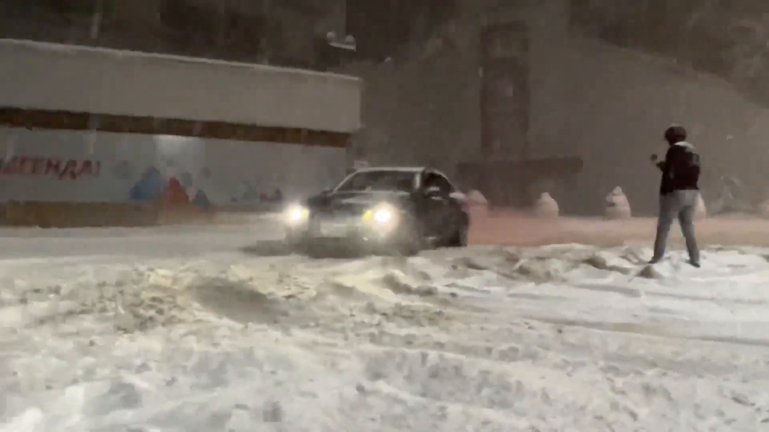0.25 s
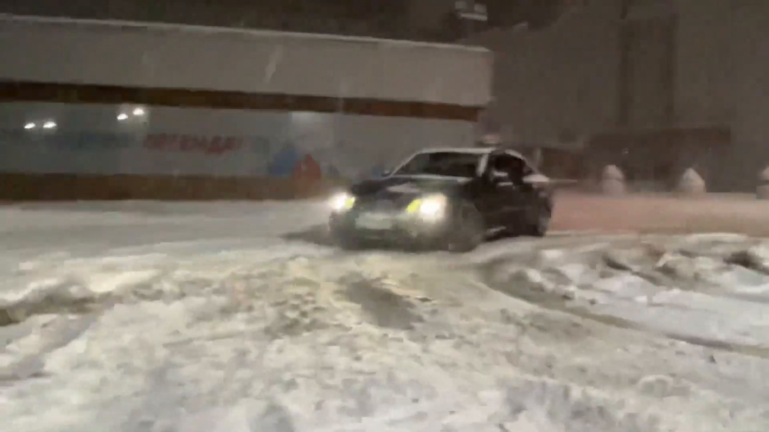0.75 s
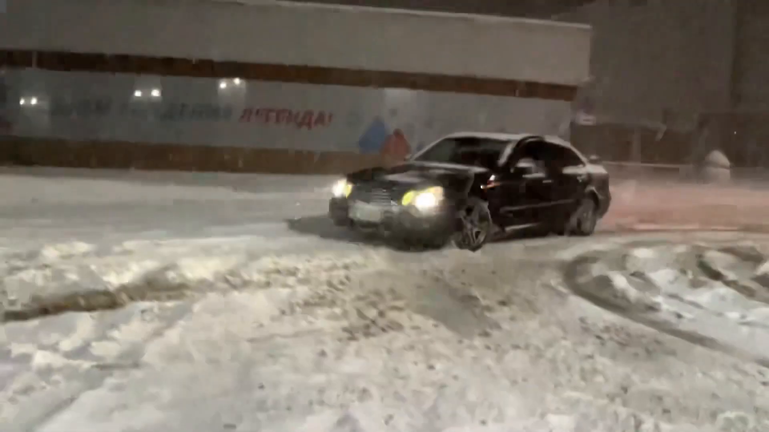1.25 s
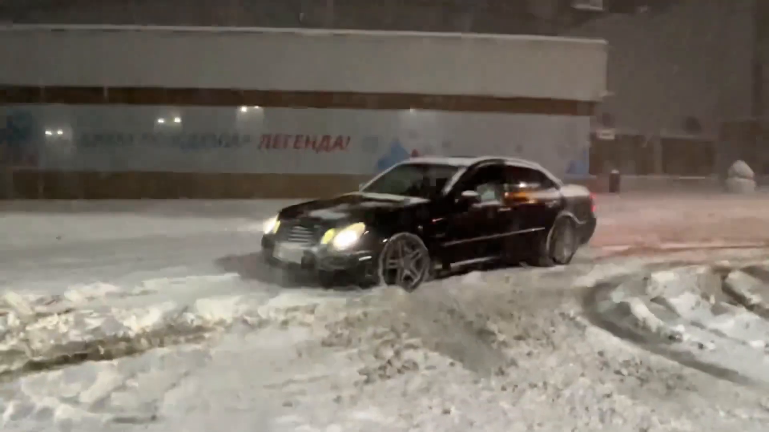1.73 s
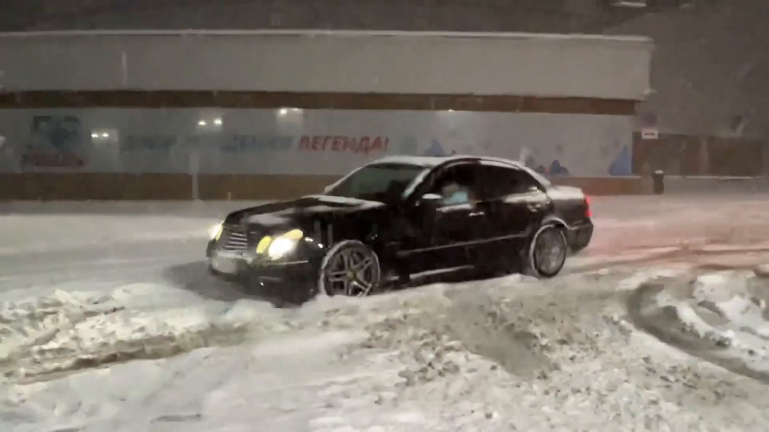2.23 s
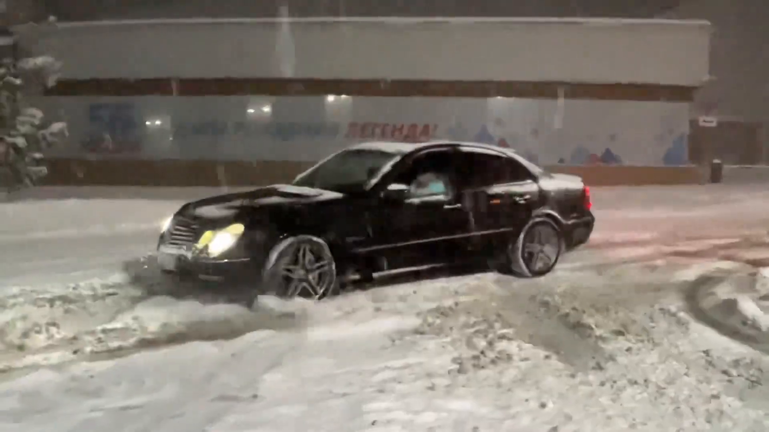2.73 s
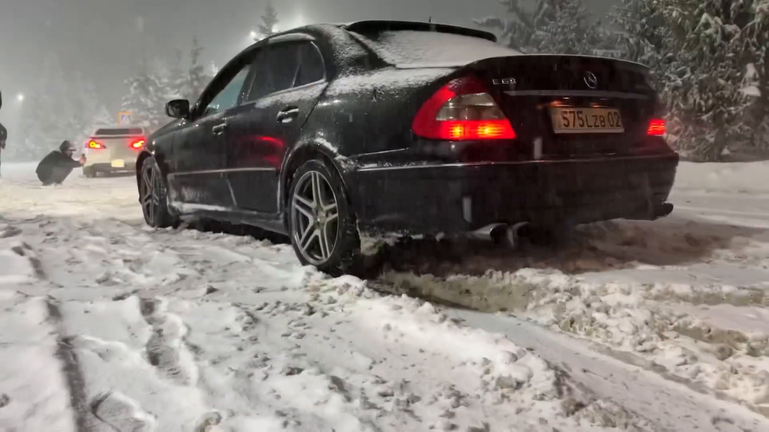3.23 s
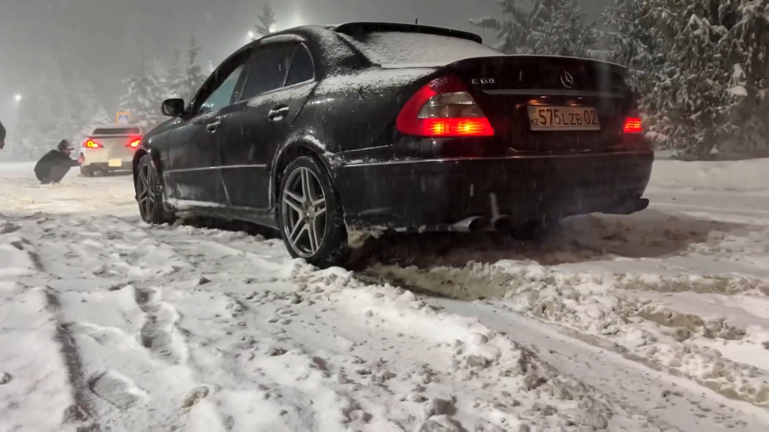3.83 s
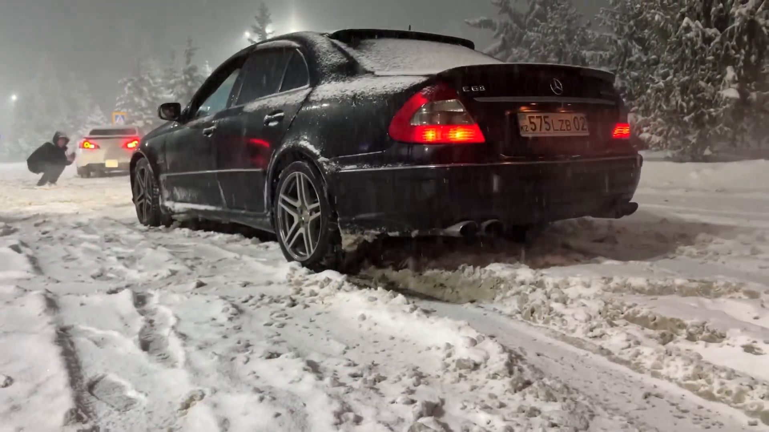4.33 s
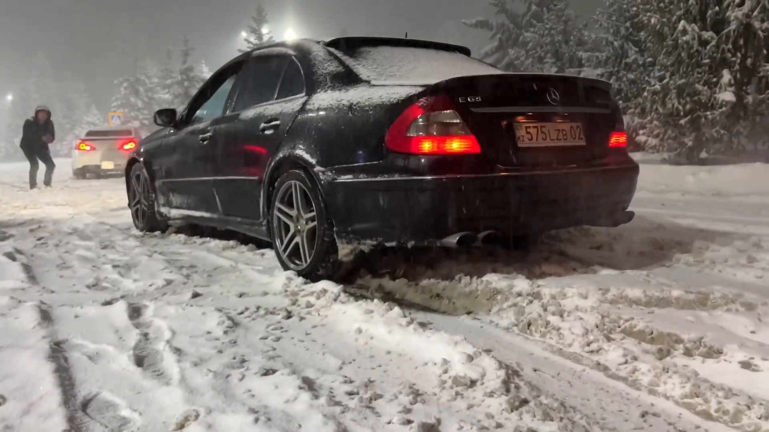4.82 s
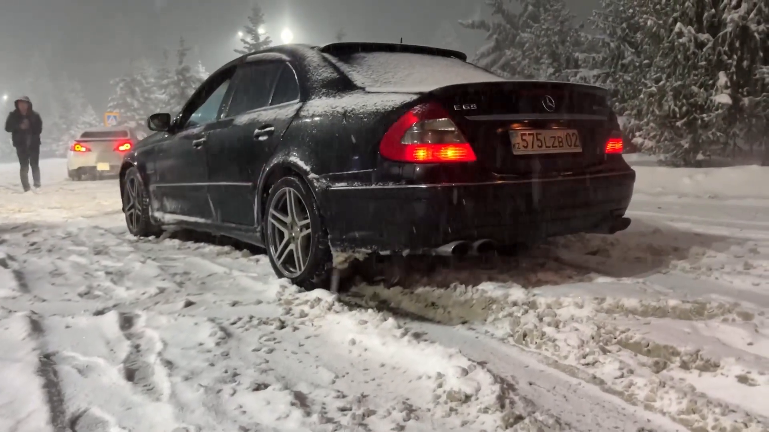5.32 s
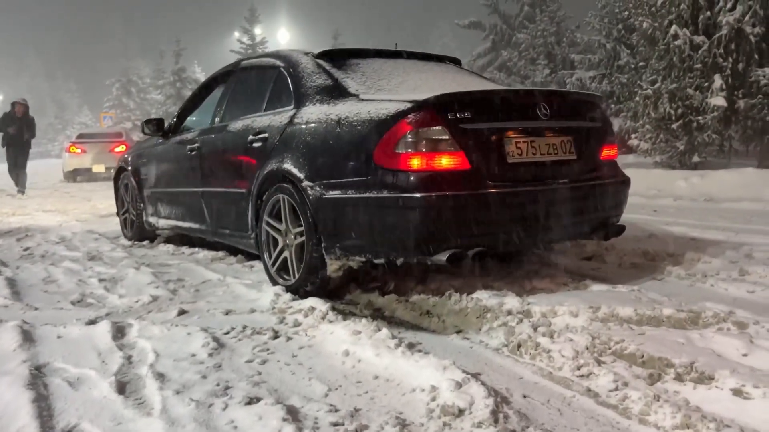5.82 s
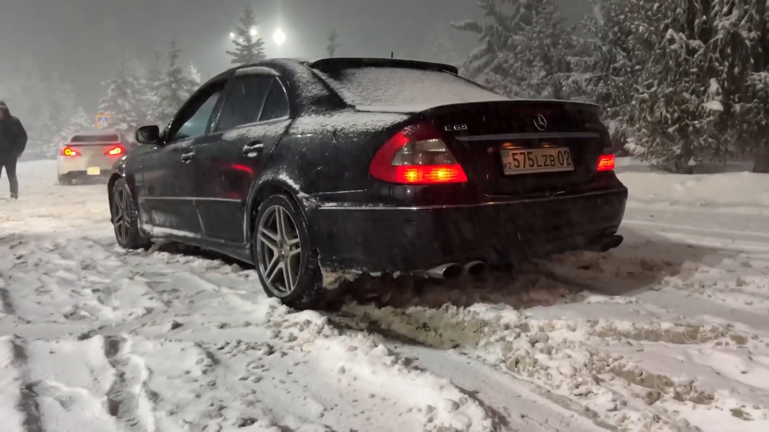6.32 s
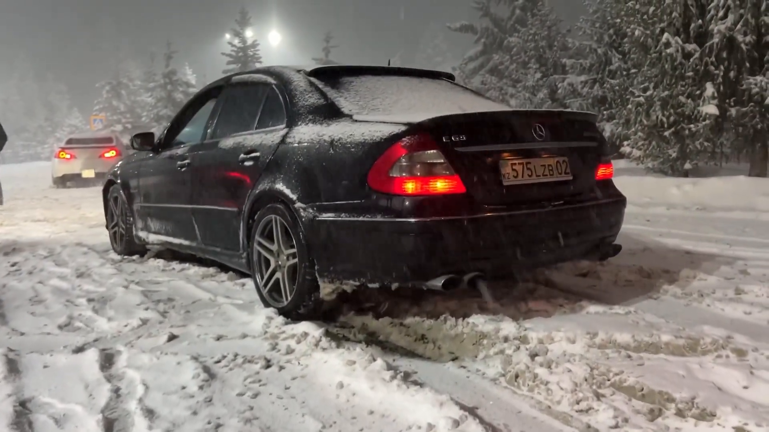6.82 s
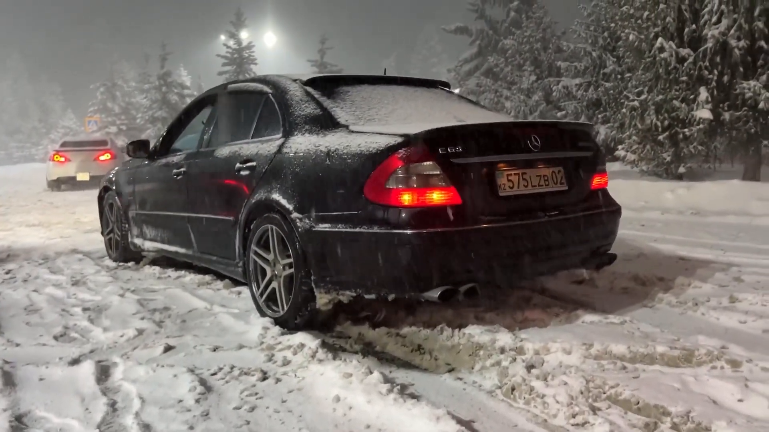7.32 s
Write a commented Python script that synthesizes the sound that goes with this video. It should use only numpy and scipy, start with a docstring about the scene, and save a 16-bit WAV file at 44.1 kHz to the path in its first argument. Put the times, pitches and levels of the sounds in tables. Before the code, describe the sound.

A V8 saloon idles distantly over crunching wet snow, then close behind its exhaust roars through three throttle blips with crackling, popping run-downs.

```python
"""V8 saloon in wet snow

A V8 creeps along at a loping idle some way off; from 3 s it is heard close by and is blipped three times.
Exhaust pulses excite pipe resonances and rasp under throttle; on the run-downs unburnt fuel pops as shock
fronts with noisy tails. Filtered grains make the snow crunch, gliding sines make a faint brake squeal,
and sparse delayed copies form the dull echo of the yard, over a steady hush of noise."""
import sys
import numpy as np
from scipy import signal
from scipy.fft import rfft, irfft, next_fast_len
from scipy.io import wavfile
from scipy.ndimage import uniform_filter1d

SR = 44100
rng = np.random.default_rng(int(sys.argv[2]) if len(sys.argv) > 2 else 0)


def waveform_to_disk(signal):
    """Save audio, clipped to [-1, 1], as 16-bit WAV at the path in sys.argv[1]."""
    frames = np.transpose(np.atleast_2d(signal))
    scaled = np.clip(frames, -1, 1) * 32767
    samples = np.round(scaled).astype(np.int16)
    wavfile.write(sys.argv[1], SR, samples)


N = 333396
TIME = np.arange(N) / SR
CLOSE_S = 3.0         # the car is near from here on
MID_SPEED_HZ = 25     # engine cycles per s from which doublings of speed are counted
PRESSURE_LEAD = .085  # the pressure wave crests this part of a cycle before its front cracks

# Cylinders in firing order. Each row: strength in dB, lateness in firing intervals,
# sharpness of the wave front in dB.
CYLINDERS = [(-3.5, 0.335, 0), (-3, 0.106, 7.5), (-1, -0.153, -0.5), (7.5, -0.108, 1.5), (4, 0.3226, -2),
             (6, -0.159, 11), (6.5, 0.2704, 0), (1.5, 0.1475, 10)]
# Spectrum of the steep pressure fronts. Each row: frequency in Hz, relative level in dB per Hz.
CRACK = [(150, -17.5), (400, -4.5), (600, -4.5), (800, 4.5), (950, 2), (1120, 7.5), (1260, 6), (1430, 7.5),
         (1850, 1.5), (2300, -11.5), (3400, -15.5), (4300, -43), (6000, -27.5), (12000, -75)]
# Spectrum of treble snap and gas hiss. Each row: frequency in Hz, relative level in dB per Hz.
SNAP = [(1500, -66.5), (2300, 13), (2850, 7.5), (3700, 9), (4400, 2.5), (5500, 2), (7500, 0.5), (8700, 6.5),
        (9400, 1), (10100, -7), (11300, 4), (12500, -7), (13700, -14), (15300, -10), (18000, -35)]


def exhaust(speed, crank):
    """Source and resonator: gas pulses ring the pipes, their fronts rasp and their puffs are turbulent."""
    # Pipe resonances at idle. Each row: frequency in Hz, width in Hz, relative level in dB.
    boom_modes = [(48.7, 3.85, 20), (81.9, 7.87, 25.5), (112.7, 17.83, 25.5), (120.57, 7.85, 26.5)]
    # Silencer resonances. Each row: frequency in Hz, width in Hz, relative level in dB.
    growl_modes = [(252, 34, -12), (352.3, 62, -3), (442.5, 45, -1.5), (463.5, 71.6, -6.5)]
    # Broad low resonances of the pipes. Each row: frequency in Hz, width in Hz, relative level in dB.
    rumble_modes = [(53.8, 73.3, 11), (94.8, 63.6, 3.5), (134.6, 26, -5.5)]
    # Turbulent gas leaving the tailpipes. Each row: frequency in Hz, relative level in dB per Hz.
    jet = [(400, -12), (620, -10), (800, 10.5), (950, 7.5), (1120, 9.5), (1260, 9), (1420, 10), (1900, 3.5),
           (2300, -8), (2900, -9), (3700, -8.5), (4600, -13), (7000, -43), (12000, -49)]

    throttle, burning, misfire, colours_db = driving()
    revving = np.interp(TIME, [3.32, 3.36], [0, 1])
    boom_db, growl_db, rasp_db, hiss_db = layer_levels(speed, throttle, misfire, revving, colours_db)

    seconds, strength, sharpness = firings(crank, burning)
    pulses = evened(clicks(seconds, strength), crank)
    raw_fronts = clicks(seconds, sharpness)
    fronts = evened(raw_fronts, crank)

    # each puff decays with a time constant of 7.4 ms; at idle the gas flows almost evenly
    puffs = rms_one(signal.lfilter([1], [1, -np.exp(-1 / (0.0074 * SR))], raw_fronts + 1e-18))
    puffs = revving * puffs + (1 - revving) * (1 + .2 * puffs)
    flow = evened(stereo_noise(side_db=-16) * (puffs + 0.14), crank)
    churn = (.12 + .88 * (1 - burning)) * flow.mean(axis=0)   # the gas tumbles most on the overrun

    # at idle single pulses ring the pipe and beat in an uneven lope
    lope = (1 - revving) * evened(band(resonate(pulses, boom_modes), 34, 270), crank)
    # at speed they merge into pure tones over a rumble
    tones = revving * from_db(colours_db[0]) * pipe_tones(speed, crank, throttle, burning)
    rumble = evened(band(resonate(fronts + churn, rumble_modes), 40.5, 179.4, order=3), crank)
    rumble = closeness() * from_db(-6.5 + 1.4 * misfire - 5.7 * throttle) * rumble

    blast = .25 * pulses + .5 * fronts + 1.2 * churn
    growl = evened(band(resonate(blast, growl_modes), 268, 1500, order=3), crank)
    growl = from_db(growl_db - 2.5) * growl

    # share of rushing gas in the rasp: high at low speed, while at high speed the fronts crack
    doublings = np.log2(speed / MID_SPEED_HZ)
    rushing = np.clip(0.54 + 0.08 * throttle - 0.56 * doublings - 0.31 * misfire, .02, .98)
    rushing = np.maximum(rushing, 1 - revving)
    cracking = np.sqrt(1 - rushing) * coloured(fronts, CRACK)
    rasp = from_db(rasp_db + 4.0) * (cracking + np.sqrt(rushing) * coloured(flow, jet))

    jets = evened(stereo_noise(side_db=-3.0) * (puffs + 0.24), crank)
    hiss = from_db(hiss_db - 5.5) * coloured(jets, SNAP)
    return from_db(boom_db) * (lope + rumble) + tones + growl + rasp + hiss


def layer_levels(speed, throttle, misfire, revving, colours_db):
    """Radiated power law: each layer's relative level in dB follows throttle, speed and misfiring."""
    # Idle levels, far off and then close. Each row: time in seconds, then relative levels
    # of boom, growl, rasp and gas hiss in dB.
    idle_levels = [(0, -23.5, -58, -57, -48.5), (1.0, -22, -63.5, -86.5, -95),
                   (2.98, -19.5, -47.5, -68, -57.5), (3.02, -18.5, -56, -62, -56),
                   (3.19, -18, -53, -57, -50), (3.32, -16, -38, -49.5, -49.5)]
    # Laws of the four layers. Each holds: coasting level in dB, its rise in dB per doubling of speed,
    # full-throttle level in dB, its rise in dB per doubling, dB added by misfiring (levels relative).
    boom_law = (-19, -3, -7.5, -4.5, 5.5)
    growl_law = (-31, 4.5, -21, 4.5, 4.5)
    rasp_law = (-47.5, 12.5, -30, -1, 6)
    hiss_law = (-65.5, 11.5, -42, -4, 10.5)
    doublings = np.log2(speed / MID_SPEED_HZ)
    levels = []
    laws = (boom_law, growl_law, rasp_law, hiss_law)
    for law, blip_db, idle_db in zip(laws, colours_db, in_time(idle_levels)):
        coasting_db, coasting_rise, open_db, open_rise, misfire_db = law
        coasting = np.maximum(coasting_db + coasting_rise * doublings, coasting_db - 31.5)
        opened = open_db + open_rise * doublings
        driven = (1 - throttle) * coasting + throttle * opened + misfire_db * misfire + blip_db
        levels.append(idle_db + revving * (driven - idle_db))
    return levels


def driving():
    """Control envelopes: throttle, clean burning and misfiring (0-1), and four layer colours in dB."""
    # Throttle blips. Each row: start in seconds, opening, held and closing times in seconds, then
    # bass, growl, rasp and hiss colour in dB, which lasts through the run-down.
    blips = [(3.306, 0.049, 0.48, 0.37, -1.5, 0.5, -5.5, -0.5), (4.944, 0.083, 0.21, 0.18, 0.5, 3, 5, 11.5),
             (6.868, 0.076, 0.2, 0.13, -8, -5, -2.5, 0)]
    # Misfiring that starts each run-down. Each row: start in seconds, building, held and fading
    # times in seconds, level shift in dB that then lasts until the next blip.
    misfires = [(3.989, 0.11, 0.14, 0.17, 8.5), (5.391, 0.049, 0.89, 0.16, -7),
                (7.298, 0.068, 0.097, 0.078, 9)]
    # Share of that level shift that reaches the bass, growl, rasp and hiss, in this order.
    shift_shares = (0.75, 0.54, 1.11, 1.95)
    shift_onset_s = 1   # the shift grows over this time up to the end of a spell

    throttle = sum(swell(*blip[:4]) for blip in blips)
    misfire = sum(swell(*spell[:4]) for spell in misfires)
    starts, _, _, _, *colours = np.transpose(blips)
    latest = np.maximum(np.searchsorted(starts, TIME) - 1, 0)
    spell_start, building, held, fading, shift_db = np.array(misfires)[latest].T
    burning = 1 - np.clip((TIME - spell_start) / building, 0, 1)
    burning = uniform_filter1d(burning, size=2000)
    since_spell = TIME - spell_start - building - held - fading
    shift = shift_db * np.clip(1 + since_spell / shift_onset_s, 0, 1)
    colours_db = [uniform_filter1d(db[latest] + share * shift, size=2000)
                  for db, share in zip(colours, shift_shares)]
    return throttle, burning, misfire, colours_db


def firings(crank, burning):
    """Four-stroke pulse train: time, strength and front sharpness per firing, erratic on the overrun."""
    count = len(CYLINDERS)
    slot = np.arange(int(crank[0] * count) + 1, int(crank[-1] * count))
    db, late, sharp_db = np.array(CYLINDERS)[slot % count].T
    seconds = np.interp((slot + late) / count, crank, TIME)
    chance = rng.standard_normal((2000, 2))[:len(slot)]
    erratic = 1 - np.interp(seconds, TIME, burning)
    strength = from_db(db + (.5 + 3.5 * erratic) * chance[:, 0])
    sharpness = from_db((1 - .7 * erratic) * sharp_db + (1 + 3 * erratic) * chance[:, 1])
    return seconds, strength, sharpness


def pipe_tones(speed, crank, throttle, burning):
    """Harmonics under a fixed formant: engine orders swell as they glide through the pipes' range."""
    # Pure exhaust tones. Each row: multiple of the cycle rate, relative level in dB on the overrun,
    # the same while burning cleanly, dB added by throttle, rise in dB per doubling of speed.
    orders = [(3, -30, -25.5, -4, 7), (5, -33, -17, 0, 0.5), (6, -27, -29.5, -13, 19),
              (7, -36, -33.5, 1, 11), (8, -38, -30, -2, 10), (9, -45, -33, -2, -3), (11, -35, -41, -2, 22),
              (12, -49, -40.5, 11, 9), (14, -41.5, -35.5, 7, -1)]
    # How well the pipes pass a tone. Each row: frequency in Hz, gain in dB.
    pipe = [(20, -22), (35, -3), (55, 1), (78, -0.5), (105, 3), (150, -4.5), (175, -12.5), (200, -9),
            (280, -1.5), (365, -6), (445, -10.5), (530, -11)]
    flutter_depth_db, flutter_hz = 5.5, 7.2   # on the overrun; a little less while burning cleanly
    pipe_hz, pipe_db = np.transpose(pipe)
    doublings = np.log2(speed / MID_SPEED_HZ)
    out = 0
    for multiple, overrun_db, burning_db, throttle_db, rise_db in orders:
        order = round(multiple)
        drift = np.interp(TIME * flutter_hz, np.arange(400), rng.standard_normal(400))
        flutter_db = flutter_depth_db * (drift - .3)
        db = burning * burning_db + (1 - burning) * overrun_db + (1 - 0.22 * burning) * flutter_db
        db = db + throttle * throttle_db + rise_db * doublings
        passed_db = np.interp(np.log(order * speed), np.log(pipe_hz), pipe_db)
        out = out + from_db(db + passed_db) * np.sin(2 * np.pi * order * (crank + PRESSURE_LEAD))
    return out


def surges(crank):
    """Resonant build-up: engine orders swell with a blip and make the run-down burble."""
    # Each row: middle in seconds, length in seconds, multiple of the cycle rate, level in dB.
    surge_rows = [(3.442, 0.3, 8, -4), (3.59, 0.15, 5, -11), (3.59, 0.17, 3, -11), (3.594, 0.1, 20, -12.5),
                  (3.907, 0.66, 5, -20), (3.911, 0.54, 2, -21), (4.13, 0.39, 3, -10.5),
                  (4.255, 0.078, 2.5, -23), (4.41, 0.23, 2.5, -16.5), (4.534, 0.063, 4.5, -15),
                  (4.71, 0.13, 2.5, -18), (4.924, 0.52, 5, -23), (5.16, 0.25, 2, -18),
                  (5.18, 0.43, 3, -14.5), (5.15, 0.2, 4, -18), (5.27, 0.65, 5, -16.5), (5.2, 0.29, 12, -18),
                  (5.207, 0.21, 14, -18), (5.476, 0.23, 3, -13), (5.516, 0.11, 11, -27),
                  (5.604, 0.11, 3.5, -12.5), (5.603, 0.13, 2.5, -13), (5.676, 0.088, 3, -23),
                  (5.884, 0.26, 3, -16.5), (6.02, 0.17, 2, -15), (6.248, 0.16, 2, -23),
                  (6.374, 0.16, 2, -21.5), (6.75, 1, 5, -28), (6.72, 0.17, 3, -27), (7.085, 0.29, 2, -15.5),
                  (7.097, 0.32, 3, -12), (7.057, 0.15, 4, -33), (7.197, .7, 5, -18.5),
                  (7.094, 0.25, 12, -20), (7.388, 0.21, 3, -12.5), (7.537, 0.3, 2.5, -12.5)]
    out = 0
    for middle, length, multiple, db in surge_rows:
        tone = np.sin(np.pi * round(2 * multiple) * (crank + PRESSURE_LEAD))
        out = out + from_db(db) * arch(middle - length / 2, length) ** 2 * tone
    return out


def whistles(crank):
    """Edge tone: bands of gas noise at the tailpipe edge spurt at each firing and throb each cycle."""
    # Whistling under open throttle. Each row: start in seconds, length in seconds,
    # frequency in Hz, width in Hz, relative level in dB.
    whistle_rows = [(3.33, 0.45, 3530, 794, -35), (3.329, 0.35, 1730, 774, -27),
                    (4.975, 0.23, 3520, 795, -33.5), (6.917, 0.35, 2850, 520, -38.5)]
    throb = 1 + 0.58 * np.cos(2 * np.pi * (crank - .2))
    spurts = rms_one(np.exp(-3.2 * (crank * len(CYLINDERS) % 1)))
    out = 0
    for start, length, hz, width, db in whistle_rows:
        gas = rms_one(band(rng.standard_normal(N), hz - width / 2, hz + width / 2))
        out = out + from_db(db - 1) * np.sqrt(np.abs(arch(start, length))) * throb * spurts * gas
    return out


def afterfire(crank):
    """Explosive shock: a front, a hot rush and small cracks behind it ring the silencer and pipe."""
    aftercracks, aftercrack_s, aftercrack_db = 3, .009, -17   # per pop, spread of delays, level
    colour_scatter_db = 2.5   # spread between the shades of a spectrum
    seconds, peak_db, snap_db, rush_db = pop_runs(crank)
    seconds = seconds + .0008
    delays = .002 + rng.exponential(aftercrack_s, (len(seconds), aftercracks))
    fading = np.exp(-delays / (4 * aftercrack_s))
    trail = from_db(aftercrack_db) * rng.standard_normal(delays.shape) * fading

    def burst(db, spectrum, t60, side_db, count=6):
        """Impulse and exponential decay: shocks and dying noise, dealt to a few shades of one spectrum."""
        out, noise = 0, stereo_noise(side_db)
        for k in range(count):
            when, height = seconds[k::count], from_db(db[k::count])
            late = (when[:, None] + delays[k::count]).ravel()
            late_height = (height[:, None] * trail[k::count]).ravel()
            shock = clicks(when, height) + clicks(late, late_height)
            onset = clicks(when, height * from_db(rush_db[k::count]))
            rush = signal.lfilter([1], [1, -from_db(-60 / (t60 * SR))], onset + 1e-18)
            scatter = np.outer(rng.standard_normal(len(spectrum)), [0, colour_scatter_db])
            out = out + coloured(shock + noise * rush, np.array(spectrum) + scatter)
        return out

    crack = burst(peak_db, CRACK, t60=0.03, side_db=-9.5)
    treble = burst(snap_db, SNAP, t60=0.044, side_db=-8)
    bang = clicks(seconds, from_db(peak_db + rush_db / 2))
    thump_modes = [(113, 74, -0.5), (364.6, 44, -2.0), (424, 83, -4.5)]   # Hz, width Hz, relative dB
    thump = band(resonate(bang, thump_modes), 72, 503)
    return from_db(11.5) * crack + from_db(12.5) * treble + from_db(47.0) * thump


def pop_runs(crank):
    """Periodic ignition: within a run the same cylinder pops again on each engine cycle."""
    # Each row: time in seconds, pops in the run, relative peak in dB, relative treble snap in dB,
    # hot rush behind the front in dB against it.
    runs = [(3.337, 1, -18.5, -47, -13.5), (3.367, 1, -14, -34, -21), (3.409, 1, -18, -45, -25),
            (3.444, 1, -12, -40, -22), (3.462, 1, -12, -36, -17), (3.474, 1, -13, -31, -22),
            (3.517, 1, -10.5, -34, -14.5), (3.532, 1, -8.5, -36, -13), (3.594, 1, -6.5, -28.5, -16),
            (3.604, 1, -10, -32, -19), (3.627, 1, -0.5, -18, -25), (3.653, 1, -14, -30, -20),
            (3.675, 1, -12, -28, -16), (3.714, 1, -15, -31, -19), (3.735, 1, -19.5, -41, -12),
            (4.011, 1, -3, -27, -26), (4.077, 1, -2.5, -14, -21.5), (4.149, 1, -18, -52, -19),
            (4.173, 1, -11, -52, -21), (4.191, 1, -1, -15, -22), (4.196, 1, -6.5, -22, -19),
            (4.21, 1, -10, -13, -20), (4.222, 1, -8.5, -14.5, -22.5), (4.238, 1, -10.5, -22, -25),
            (4.272, 1, -8, -28, -12.5), (4.357, 1, -7.5, -21.5, -14.5), (4.377, 1, -7.5, -28, -19.5),
            (4.391, 1, -4.5, -9.5, -24.5), (4.434, 1, -7.5, -28, -16.5), (4.445, 1, -8.5, -29, -25),
            (4.499, 1, -19, -52, -18), (4.531, 1, -19.5, -37, -11.5), (4.549, 1, 0, -17.5, -24),
            (4.576, 1, -7, -16.5, -16), (4.6, 1, 0.5, -20, -25), (4.715, 1, -11, -57, -22),
            (4.998, 1, -4, -36, -17), (5.02, 1, -5, -33, -31), (5.126, 7, -2, -12, -22),
            (5.388, 1, -13.5, -42.5, -16), (5.417, 1, -8.5, -27, -19), (5.429, 1, -0.5, -14, -29),
            (5.449, 1, -8, -18.5, -20), (5.471, 2, -2, -13, -30), (5.482, 3, -14.5, -29, -12),
            (5.531, 2, 0.5, -13.5, -35), (5.569, 1, -7.5, -16.5, -18.5), (5.599, 1, -8, -15, -17),
            (5.627, 1, -11, -21, -19), (5.654, 1, -2.5, -13, -23), (5.682, 1, -10, -20, -24),
            (5.699, 1, -2.5, -14, -26), (5.752, 1, -20, -65, -23), (5.819, 1, -15, -60.5, -28.5),
            (5.855, 1, -6.5, -18, -17.5), (5.875, 1, -16, -49, -17), (5.892, 1, -1, -19, -28),
            (5.917, 1, -6, -28.5, -30), (5.926, 1, -10.5, -36, -15.5), (5.947, 1, -11, -49, -23),
            (5.977, 1, -4, -18, -20.5), (6.037, 1, -11, -52, -35), (6.063, 1, -4.5, -35, -24),
            (6.089, 1, -4.5, -16, -19), (6.104, 1, -3.5, -19.5, -26), (6.139, 1, -10.5, -48, -31),
            (6.171, 1, -6.5, -23, -27), (6.194, 1, -9.5, -27, -24), (6.218, 1, -12, -46, -30),
            (6.236, 1, -6, -36, -26), (6.268, 1, -2.5, -17.5, -29), (6.278, 1, -3.5, -14.5, -25),
            (6.328, 1, -17, -58, -28), (6.391, 1, -13, -55, -18.5), (6.408, 1, -15, -34.5, -15.5),
            (6.526, 1, -25, -59.5, -11.5), (6.683, 1, -23.5, -55.5, -21.5), (7.04, 1, -12, -17, -20),
            (7.092, 4, -3, -15.5, -25.5), (7.217, 1, -5.5, -25.5, -25), (7.296, 1, -7.5, -45, -22),
            (7.324, 1, -7.5, -21, -19.5), (7.347, 1, -9, -46, -20), (7.366, 3, -0.5, -16.5, -28.5),
            (7.376, 3, -9.5, -30, -26), (7.455, 2, -4.5, -22, -25), (7.462, 1, -4.5, -13, -18),
            (7.513, 1, -4, -12.5, -16.5)]
    pops = []
    for start, count, *levels_db in runs:
        first_cycle = np.interp(start, TIME, crank)
        for k in range(round(count)):
            pops.append((np.interp(first_cycle + k, crank, TIME), *levels_db))
    seconds, peak_db, snap_db, rush_db = np.transpose(pops)
    scatter_db = 1.78 * rng.standard_normal(len(pops))   # from one pop to the next
    return seconds, peak_db + scatter_db, snap_db + scatter_db, rush_db


def belt_drive():
    """Narrow-band resonance: a thin whine and hiss from the front of the engine, heard only close by."""
    # Whine of the belt drive. Each row: frequency in Hz, width in Hz, relative level in dB.
    whine_modes = [(1395, 50, 1), (1610, 60, -1), (1750, 50, -5), (1978, 25, 2)]
    whine = from_db(-57.0) * rms_one(resonate(rng.standard_normal(N), whine_modes))
    hiss = from_db(-69) * rms_one(band(stereo_noise(side_db=2.0), 5800, 9000))
    return (TIME > CLOSE_S) * (whine + hiss)


def rolling():
    """Granular fracture and stick-slip: wet snow crunches under the tyres and a brake squeals faintly."""
    # Lumps of icy snow that crack under a tyre. Each row: time in seconds, relative level in dB.
    crunches = [(1.745, -44), (2.1, -31.5), (2.465, -39)]
    # Brake squeals. Each row: start in seconds, end in seconds, start frequency in Hz,
    # end frequency in Hz, relative level in dB, chatter from 0 to 1.
    squeals = [(.27, 0.452, 1670, 1380, -58, 0.5), (.24, 0.363, 5200, 4650, -72, 1),
               (0.445, .55, 1780, 1720, -57.5, .2), (.48, .54, 3450, 3510, -66, .1),
               (0.546, .616, 1720, 1770, -51, 0.2), (.726, .81, 1810, 1780, -62, .3),
               (0.924, 1.25, 5900, 6160, -72.5, 0.6), (1.873, 1.888, 2500, 2500, -60, .3),
               (2.037, 2.06, 2480, 2530, -60, .3)]
    grain_db = 5.5 * np.minimum(rng.exponential(1, N), 3)
    grains = (rng.random(N) < 130 / SR) * from_db(grain_db)   # 130 grains per s
    snow = from_db(-72.0) * rms_one(band(grains + 1e-18, 1800, 6900))
    out = snow * np.interp(TIME, [.8, 1.8, 2.95, 3.05], [0.33, 1.0, 1, 0.38])
    seconds, crunch_db = np.transpose(crunches)
    out = out + band(clicks(seconds, from_db(crunch_db + 11)) + 1e-18, 2700, 6500)
    for start, end, start_hz, end_hz, db, chatter in squeals:
        wobble, flicker = (rms_one(band(noise, 17, 90)) for noise in rng.standard_normal((2, N)))
        glide_hz = np.interp(TIME, [start, end], [start_hz, end_hz])
        phase = 2 * np.pi * np.cumsum(glide_hz * (1 + .012 * chatter * wobble)) / SR
        tone = np.sin(phase) * np.maximum(1 + chatter * flicker, 0)
        out = out + from_db(db + 5.5) * np.sqrt(np.abs(arch(start, end - start))) * tone
    return out


def ports(x):
    """Interaural difference: two microphones hear the near car with a lead and level set by frequency."""
    # Each row: frequency in Hz, lead of the left in radians, left minus right in dB.
    differences = [(300, 0, 0), (800, -.12, -1.3), (1450, -.7, -2), (2400, -.55, 0), (3400, .4, .5),
                   (4900, -.2, 4.5), (7600, .1, -2.5), (8500, 0, 0), (10200, -3.1, 0), (15000, -12.5, 0)]
    hz, lead, db = np.transpose(differences)
    size = next_fast_len(N + 4096)
    bins = np.fft.rfftfreq(size, 1 / SR)
    # half of the difference goes to the left, its inverse to the right
    half = from_db(np.interp(bins, hz, db) / 2) * np.exp(.5j * np.interp(bins, hz, lead))
    near = irfft(rfft(x, size) * np.array([half, 1 / half]), size)[:, :N]
    return x + closeness() * (near - x)


def closeness():
    """Direct-field crossfade: 0 while the car is far off, 1 once it is near."""
    return np.clip((TIME - CLOSE_S) / .03, 0, 1)


def yard_echo(x, t60, wet_db):
    """Sparse reverberation: dull reflections from walls and trees decay, different at each ear."""
    age = np.arange(SR // 2) / SR
    taps = rng.standard_normal((2, len(age))) * (rng.random((2, len(age))) < 900 / SR)
    taps = taps * from_db(-60 * age / t60) * (age > .006)
    taps = taps / np.linalg.norm(taps, axis=1, keepdims=True)
    return from_db(wet_db) * signal.oaconvolve(band(x, 270, 4600, order=1), taps, axes=1)[:, :N]


def yard_hush():
    """Diffuse ambient field: steady noise with the spectrum of the yard."""
    # Each row: frequency in Hz, relative level in dB per Hz.
    yard = [(120, -26), (200, 1), (449, -17.5), (590, -15.5), (1920, -27), (2530, -28.5), (4240, -38),
            (6240, -38.5), (9500, -47.5), (12400, -99.5), (20900, -120)]
    return from_db(-44.0) * coloured(stereo_noise(side_db=-3.0), yard)


def from_db(db):
    """Logarithmic level: decibels to amplitude gain."""
    return np.exp(np.asarray(db) * (np.log(10) / 20))


def rms_one(x):
    """Normalisation of mean power to one."""
    return x / np.sqrt(np.mean(x ** 2) + 1e-20)


def evened(x, crank):
    """Running power normalisation over two engine cycles; the lope inside a cycle stays."""
    energy = np.cumsum(np.mean(np.atleast_2d(x) ** 2, axis=0))
    first, last = (np.minimum(np.searchsorted(crank, crank + side), N - 1) for side in (-1, 1))
    return x / np.sqrt((energy[last] - energy[first]) / (last - first) + 1e-20)


def in_time(rows):
    """Linear interpolation of each column of a curve table, sample by sample."""
    s, *columns = np.transpose(rows)
    return [np.interp(TIME, s, c) for c in columns]


def swell(start, attack, hold, release):
    """Trapezoidal envelope: attack, hold and release, between 0 and 1."""
    return np.interp(TIME, start + np.cumsum([0, attack, hold, release]), [0, 1, 1, 0])


def arch(start, length):
    """Half-sine envelope, between 0 and 1."""
    return np.sin(np.pi * np.clip((TIME - start) / length, 0, 1))


def clicks(seconds, heights):
    """Unit-impulse excitation: single-sample pulses at the given times."""
    return np.bincount(np.clip(np.round(seconds * SR).astype(int), 0, N - 1), heights, N)


def stereo_noise(side_db):
    """Partial coherence: white noise, partly different at the two ears."""
    mid, side = rng.standard_normal((2, N))
    return rms_one(mid + from_db(side_db) * side * [[1], [-1]])


def coloured(x, spectrum):
    """Minimum-phase filtering with the given spectrum, by way of the cepstrum, at unit energy."""
    size = 4096
    hz, db = np.transpose(spectrum)
    gain = from_db(np.interp(np.log(np.fft.rfftfreq(size, 1 / SR) + 1), np.log(hz), db))
    cepstrum = irfft(np.log(gain))[:size // 2]
    response = irfft(np.exp(2 * rfft(cepstrum, size)))
    response = response / np.linalg.norm(response)
    return signal.oaconvolve(np.atleast_2d(x), response[None], axes=1)[:, :N]


def resonate(x, modes):
    """Modal superposition: parallel two-pole resonances with alternating signs."""
    out = 0
    for k, (hz, width, db) in enumerate(modes):
        r = np.exp(-np.pi * width / SR)
        poles = [1, -2 * r * np.cos(2 * np.pi * hz / SR), r * r]
        ringing = signal.lfilter([1, 0, -1], poles, x + 1e-18)
        out = out + (-1) ** k * from_db(db) * (1 - r * r) / 2 * ringing
    return out


def band(x, low_hz, high_hz, order=2):
    """Butterworth band-pass filtering."""
    return signal.sosfilt(signal.butter(order, [low_hz, high_hz], "band", fs=SR, output="sos"), x)


def scene():
    """Superposition: the crank drives the exhaust; pops, tyres and the hush of the yard join it."""
    # Engine speed, from idle through three blips. Each row: time in seconds, four-stroke cycles per s.
    engine_speed = [(3.33, 5.945), (3.6, 18.9), (3.69, 23.8), (3.8, 26.7), (3.95, 28.4), (4.16, 25.7),
                    (4.6, 18.7), (4.96, 17.8), (5.2, 30.6), (5.31, 34.2), (5.41, 34.3), (6.16, 24.7),
                    (6.52, 21.3), (6.7, 19.3), (6.87, 18.7), (7.11, 31.2), (7.21, 34.4), (7.3, 34.9),
                    (7.56, 30.9)]
    speed, = in_time(engine_speed)
    crank = .4625 + np.cumsum(speed) / SR   # in engine cycles, part of one gone at the start
    car = exhaust(speed, crank) + afterfire(crank) + surges(crank) + whistles(crank) + belt_drive()
    lean_db = np.interp(TIME, [2.8, 3.2], [.55, .1])   # the car is a little to the right
    direct = ports(car * from_db(lean_db * np.array([[-1], [1]])))
    return direct + yard_echo(car, t60=0.16, wet_db=-15.5) + rolling() + yard_hush()


def record(dry):
    """Saturation and band limiting: the loudest peaks are rounded off, and the top is cut."""
    rounded = dry / (1 + (dry / .93) ** 6) ** (1 / 6)
    stopband_hz = 17200   # 70 dB down from here
    return signal.sosfilt(signal.cheby2(12, 70, stopband_hz, fs=SR, output="sos"), rounded)


dry = scene()
out = record(dry)
waveform_to_disk(out)
```